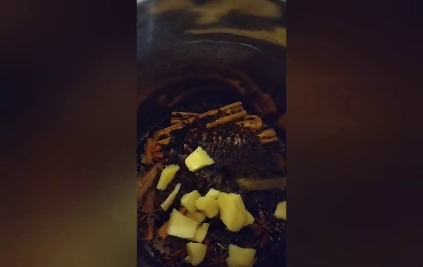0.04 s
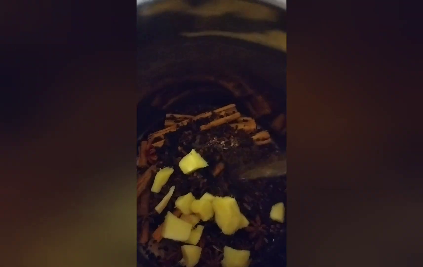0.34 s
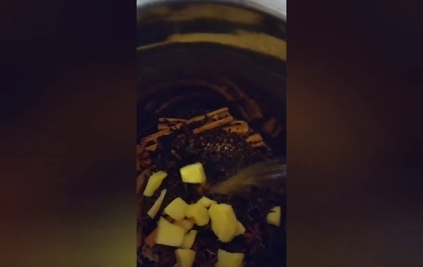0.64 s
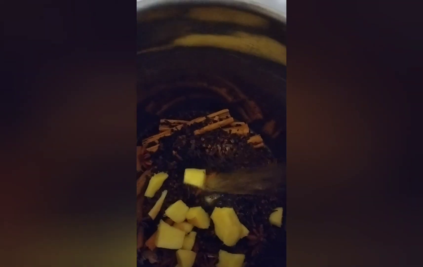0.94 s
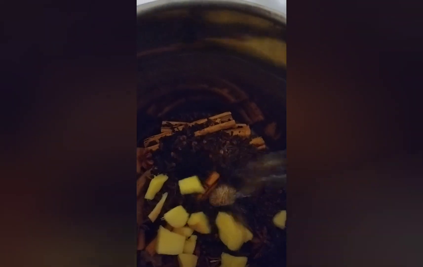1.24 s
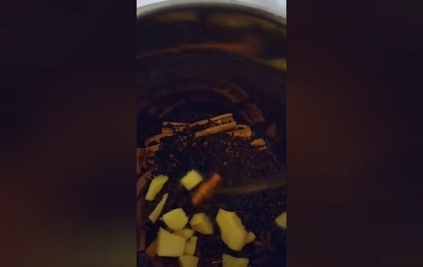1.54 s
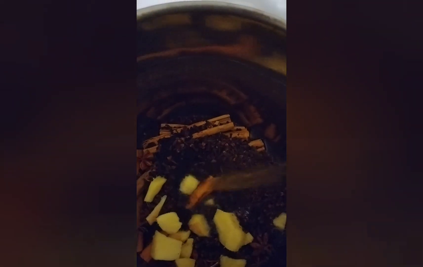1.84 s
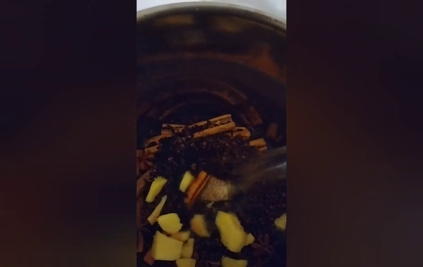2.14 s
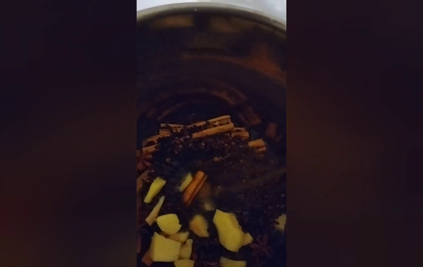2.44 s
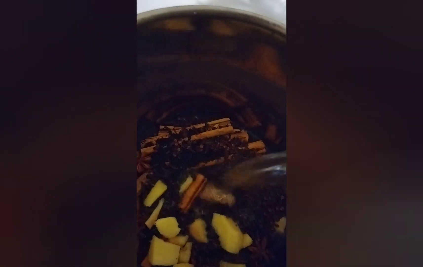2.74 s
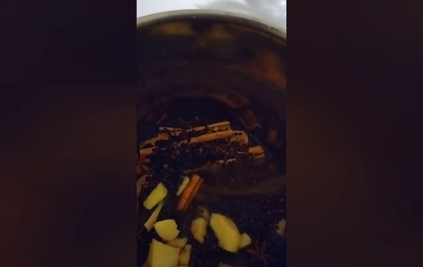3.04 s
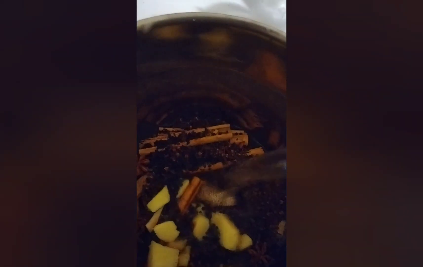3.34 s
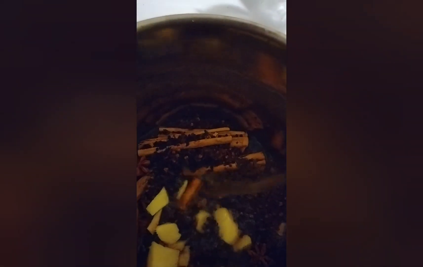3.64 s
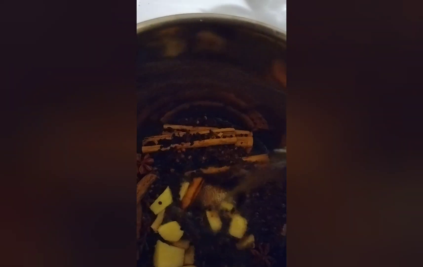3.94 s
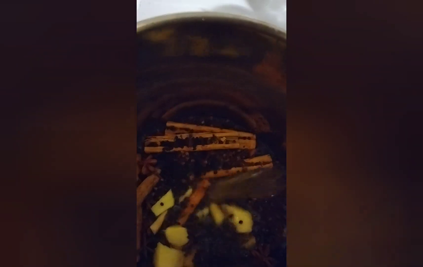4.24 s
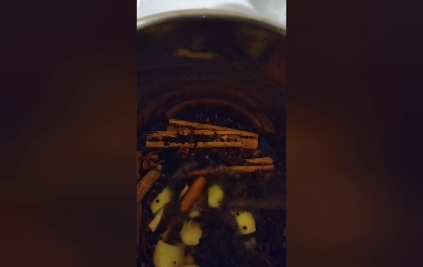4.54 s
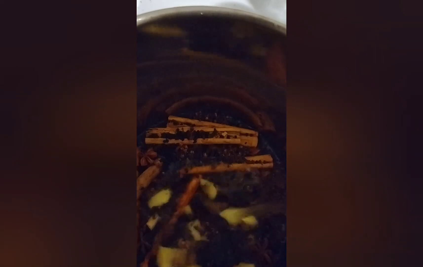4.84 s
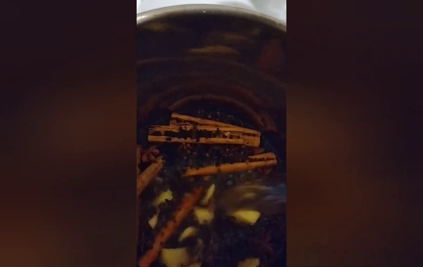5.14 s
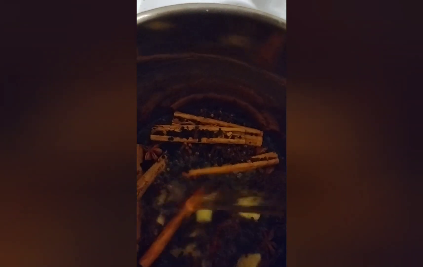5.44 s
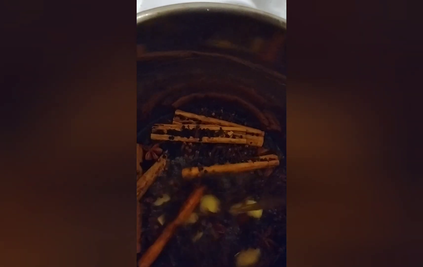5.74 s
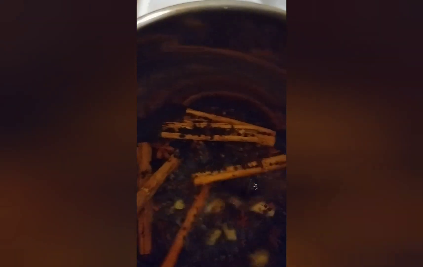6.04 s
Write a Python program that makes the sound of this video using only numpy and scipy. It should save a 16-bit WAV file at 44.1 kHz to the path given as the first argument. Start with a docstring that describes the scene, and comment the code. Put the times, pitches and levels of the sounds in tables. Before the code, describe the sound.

A bottle glugs as its water splashes unevenly into a metal pot of dry spices, gurgling more as a pool forms.

```python
"""Water poured onto spices in a pot

Water runs from a bottle into a metal pot of dry spices, close to a microphone. The bottle gulps air
about four times a second, so the stream arrives in slugs that thud, spatter and bubble over the
spices. Drops tap the steel base until water covers it. The air in the pot rings with all of it."""
import sys
import numpy as np
from scipy import signal
from scipy.fft import rfft, irfft, next_fast_len
from scipy.io import wavfile

SR = 44100
rng = np.random.default_rng(int(sys.argv[2]) if len(sys.argv) > 2 else 0)


def master_out(mix):
    """Clip the mix to full scale and print it as 16-bit PCM to the path in sys.argv[1]."""
    frames = np.transpose(np.atleast_2d(mix))
    ceiling = np.clip(frames, -1, 1)
    pcm = np.round(ceiling * 32767).astype(np.int16)
    wavfile.write(sys.argv[1], SR, pcm)


N = 277731
TIME_S = np.arange(N) / SR
PLOP_CYCLES, DRIP_CYCLES = 2.3, 7.5

# slugs of water leaving the bottle: (start [s], length [s], spray [dB], bubbling [dB])
SLUGS = [(0.01, 0.11, -27, -34.5), (0.12, 0.3, -29, -32), (0.448, 0.19, -30, -27.5),
         (0.634, 0.16, -30.5, -29.5), (0.77, 0.13, -31.5, -31.5), (0.913, 0.16, -26.5, -30.5),
         (1.083, 0.21, -32, -30), (1.282, 0.17, -29.5, -30.5), (1.41, 0.24, -33, -32),
         (1.641, 0.15, -30, -33), (1.811, 0.2, -28.5, -29), (2.009, 0.16, -28, -29),
         (2.162, 0.22, -28.5, -32), (2.379, 0.2, -28, -27.5), (2.569, 0.15, -28.5, -31),
         (2.678, 0.11, -35.5, -29.5), (2.776, 0.19, -29.5, -31), (2.993, 0.19, -29, -30),
         (3.205, 0.18, -28.5, -29.5), (3.397, 0.19, -29, -31), (3.582, 0.21, -28, -27.5),
         (3.793, 0.24, -28.5, -28.5), (4.049, 0.19, -30.5, -31), (4.283, 0.18, -32, -30.5),
         (4.507, 0.19, -29.5, -30.5), (4.745, 0.19, -30.5, -29), (4.964, 0.22, -32.5, -31),
         (5.178, 0.22, -34, -30), (5.453, 0.18, -30, -31), (5.663, 0.11, -29.5, -40.5),
         (5.754, 0.12, -24.5, -25.5), (5.892, 0.22, -29, -30.5), (6.157, 0.14, -31.5, -33)]


def flow(levels_db, trickle_db, trickle_db_per_s, lean_db, splash_db, build_s=0.086, break_s=0.02):
    """Stream envelope: slugs and splashes over a fading trickle; lean_db weakens each slug's head."""
    # stream slapping the spices: (time [s], level [dB])
    splashes = [(0.488, -31), (0.38, -26.5), (0.62, -26.5), (0.87, -26), (1.035, -30.5), (1.385, -25.5),
                (1.53, -29), (2.46, -26.5), (2.745, -27.5), (3.105, -30), (3.484, -32), (4.685, -37),
                (4.84, -42), (4.928, -31), (5.291, -30.5), (5.365, -30.5), (5.417, -25), (5.54, -26),
                (5.948, -26.5), (6.242, -30)]
    splash_s = 0.048
    power = gain_of(trickle_db + trickle_db_per_s * TIME_S) ** 2
    for (start_s, length_s, _, _), db in zip(SLUGS, levels_db):
        t = np.arange(int((length_s + 6 * break_s) * SR)) / SR
        shape = np.minimum(t / build_s, 1) * np.exp(-np.maximum(t - length_s, 0) / break_s)
        level = gain_of(db + lean_db * (np.minimum(t / length_s, 1) - 1))
        add(power[None], start_s, (shape * level) ** 2)
    for s, db in splashes:
        splash = gain_of(db + splash_db) * np.hanning(int(splash_s * SR))
        add(power[None], s - splash_s / 2, splash ** 2)
    return np.sqrt(power)


def spray(strength, mist_db=-1.5, droplets_db=-4, afloat_s=4.1):
    """Fine spatter and tinkling droplets; the treble softens once the spices float."""
    # mist EQ: (frequency [Hz], gain [dB])
    mist_eq = [(1800, 15), (2600, -1.5), (3100, -2), (4000, 2), (4800, 4), (5700, 0), (7200, -1),
               (8200, -3.5), (10500, -4.5), (12300, -9.5), (14200, -3)]
    # added EQ with the spices afloat: (frequency [Hz], gain [dB])
    afloat_eq = [(4300, -0.5), (5400, -8), (6100, -5.5), (7000, -1.5), (9500, -4), (14000, -1.5)]
    mist = patter(2516, 13370, per_s=9000, cycles=2.5, spread_db=-1.5, clump_db=2.5, clumps_per_s=100,
                  patch_db=3.5, pan=0.5, count=36)
    droplets = patter(3500, 11500, per_s=420, cycles=DRIP_CYCLES, spread_db=3.2, clump_db=2.4,
                      clumps_per_s=110, pan=1, count=48)
    mist = colour(np.diff(mist, prepend=0) + mist / 2, mist_eq)
    spatter = mist / rms(mist) * gain_of(mist_db) + droplets * gain_of(droplets_db)
    afloat = np.clip(TIME_S - afloat_s, 0, 1)
    return ((1 - afloat) * spatter + afloat * colour(spatter, afloat_eq)) * strength


def bubbles(bubbling, sloshing, fine_db=-6, chirps_db=-4, fizz_db=-6, slosh_db=-7, gurgle_db=-6):
    """Bubbles where the stream lands; a deeper pool gives more gurgle, fizz and rising chirps."""
    fine = patter(1563, 2340, per_s=900, cycles=4.2, spread_db=4, clump_db=1.5, clumps_per_s=38,
                  count=12)
    chirps = patter(1050, 2600, per_s=420, cycles=3.8, spread_db=3.8, clump_db=2, clumps_per_s=40,
                    glide=0.06)
    fizz = patter(2860, 4370, per_s=660, cycles=DRIP_CYCLES, spread_db=5, clump_db=8.5,
                  clumps_per_s=37, count=12)
    slosh = patter(740, 1500, per_s=1200, cycles=0.97, spread_db=4, clump_db=2, clumps_per_s=66,
                   count=12)
    gurgle = patter(365, 670, per_s=220, cycles=PLOP_CYCLES, spread_db=3.5, clump_db=4, clumps_per_s=28)
    depth = TIME_S / TIME_S[-1]
    shallow = 1 - 0.42 * depth ** 2
    foam = fine * shallow * gain_of(fine_db)
    foam += (chirps * gain_of(chirps_db) + fizz * gain_of(fizz_db)) * depth ** 2
    swirl = slosh * shallow * gain_of(slosh_db) + gurgle * depth ** 3 * gain_of(gurgle_db)
    return foam * bubbling + swirl * sloshing


def gulps(neck_hz=298, rise_s=0.00033, glide_per_s=0.16, gain_db=-5, echo_s=0.034, echo_db=-15):
    """A big bubble enters the bottle and throbs under a brief upper mode; a faint room echo follows."""
    # air drawn through the neck: (time [s], level [dB], decay [s])
    intakes = [(0.636, -20.5, 0.0093), (2.38, -24.5, 0.01), (2.585, -22, 0.0099), (2.791, -16.5, 0.011),
               (2.992, -22, 0.019), (3.182, -15.5, 0.02), (3.383, -16.5, 0.021), (3.607, -18.5, .018),
               (3.841, -18, 0.018), (4.066, -16.5, 0.017), (4.298, -17.5, 0.018), (4.545, -16, .018),
               (4.771, -15, 0.016), (5.007, -16, 0.014), (5.242, -16, 0.01), (5.47, -16.5, .011),
               (5.694, -17.5, 0.0065), (5.928, -20.5, 0.012), (6.154, -22, 0.01)]
    out = np.zeros((2, N))
    t = np.arange(4000) / SR
    for s, db, decay_s in intakes:
        detune, lag, upper_level, upper_detune = rng.standard_normal(4)
        swell = (1 - np.exp(-t / rise_s)) * np.exp(-(t / decay_s) ** 2)
        swell /= swell.max()
        phase = 2 * np.pi * neck_hz * (1 + 0.025 * detune) * (t + glide_per_s * t ** 2)
        upper_ratio = 1.816 + 0.14 * upper_detune
        upper = gain_of(-4 + 2.5 * upper_level) * swell ** 3.5 * np.sin(upper_ratio * phase)
        throb = -gain_of(db + gain_db) * (swell * np.sin(phase) + upper)
        add(out, s, throb)
        add(out, s + echo_s * (1 + lag / 10), throb * gain_of(echo_db))
    return out


def thuds(gain_db=-3, splash_gain_db=-1, bump_hz=150, bump_db=-7, cushion_db_per_s=-5):
    """Lumps of water land with a dull push and coarse splash, bumping a base the pool slowly cushions."""
    # landings: (time [s], level [dB], pitch [Hz], splash [dB], splash swell [s])
    lumps = [(0.218, -20, 420, -23.5, 0.0028), (0.257, -22, 535, -30, 0.003),
             (0.322, -21.5, 266, -26, 0.0035), (0.614, -16.5, 430, -22, 0.0096),
             (0.873, -11.5, 504, -23, 0.0039), (0.957, -14, 940, -20, 0.002),
             (1.223, -15, 680, -28, 0.0052), (1.481, -9, 714, -28, 0.0018),
             (1.594, -14.5, 620, -30, 0.0073), (2.36, -21.5, 400, -26, 0.0055),
             (2.549, -17, 610, -30, 0.0088), (2.738, -13, 430, -23, .009), (2.959, -20.5, 480, -29.5, 0.01),
             (3.064, -21, 634, -34, .003), (3.167, -21, 402, -26.5, 0.014), (3.371, -13.5, 480, -35, .009),
             (3.576, -18.5, 360, -30, 0.0058), (3.686, -16, 920, -26, 0.0017),
             (5.372, -21, 600, -27.5, 0.006), (5.5995, -17, 804, -23.5, 0.0033),
             (5.848, -17, 517, -33.5, 0.016), (6.28, -11.5, 535, -24, 0.0062)]
    out = pops([row[:3] for row in lumps], cycles=0.8, glide=0, gain_db=gain_db)
    t = np.arange(6000) / SR
    bursts = np.zeros((1, N))
    for s, db, _, splash_db, swell_s in lumps:
        add(bursts, s - swell_s / 2, gain_of(splash_db + splash_gain_db) * swell_and_fade(t, swell_s))
        add(out, s, gain_of(db + bump_db + cushion_db_per_s * s) * bubble(bump_hz, cycles=0.5))
    coarse = patter(300, 1700, per_s=2500, cycles=1.5, spread_db=0, clump_db=1, clumps_per_s=170,
                    count=14)
    return out + bursts * coarse


def plops(gain_db=-4, brood_gain_db=-4, scatter=0.18, count=60):
    """A large bubble closes and sheds a brood of others near its own pitch."""
    # large bubbles: (time [s], level [dB], pitch [Hz], brood [dB], brood swell [s])
    closures = [(0.221, -12.5, 1470, -23, 0.0034), (.3006, -0.5, 890, -36, .004),
                (0.3029, -6.5, 1250, -40, .004), (0.3044, -12, 1200, -30, 0.0083),
                (.543, -11, 1950, -29, .003), (1.255, -13.5, 1810, -35, .006),
                (1.631, -10, 1940, -25, .003), (2.867, -6.5, 2130, -30, 0.0025),
                (3.364, -13.5, 1360, -38, 0.0034), (3.871, -12, 1900, -26, 0.0041),
                (5.039, -15, 1500, -28.5, 0.0039), (5.286, -19, 1920, -26, .006),
                (5.355, -12.5, 1650, -24, 0.0058), (5.523, -14, 1820, -23, 0.0076),
                (5.599, -12.5, 1710, -26, 0.0017), (5.781, -21, 1160, -29, 0.0089),
                (5.828, -16, 1680, -24, .007), (5.943, -9, 1840, -21, 0.0032),
                (5.956, -5, 2400, -20, 0.0027), (6.057, -14, 1490, -26, .003),
                (6.227, -17, 1590, -35, .004), (6.25, -15, 1250, -23, .005)]
    out = pops([row[:3] for row in closures], cycles=PLOP_CYCLES, glide=0.012, gain_db=gain_db)
    for s, _, hz, brood_db, swell_s in closures:
        t = np.arange(int(7 * swell_s * SR)) / SR
        brood = np.zeros((1, len(t)))
        for when, pitch in rng.random((count, 2)):
            add(brood, when * t[-1], bubble(hz * np.exp(scatter * (2 * pitch - 1)), PLOP_CYCLES))
        add(out, s, gain_of(brood_db + brood_gain_db) * brood / rms(brood) * swell_and_fade(t, swell_s))
    return out


def ticks(ping_db=-4.5, mist_db=-4, rise_s=0.0002, decay_s=0.0022):
    """A drop snaps with a short ping and a puff of mist, brighter at higher pitch."""
    # sharp drops and bursting bubbles: (time [s], level [dB], pitch [Hz])
    drops = [(.317, -7.5, 5160), (.3816, -2.5, 4570), (.8315, -13, 3500), (1.1246, -1, 9100),
             (1.449, -12, 5700), (1.466, -7, 5100), (1.481, -10, 5700), (1.51, -7, 4270), (1.984, -7, 7000),
             (2.282, -1.5, 10600), (3.255, -2, 9500), (3.315, -16, 3840), (3.3412, -2.5, 7250),
             (3.944, -6, 4700), (4.004, -6.5, 9400), (4.593, -8, 5040), (4.832, -13, 3800),
             (4.846, -12, 3500), (5.173, -5.5, 7000), (5.5995, -3.5, 4640), (6.106, -5, 5360)]
    out = pops(drops, cycles=3.5, glide=0.0059, gain_db=ping_db, pan=0.099)
    t = np.arange(900) / SR
    puff = np.minimum(t / rise_s, 1) * np.exp(-t / decay_s)
    for s, db, hz in drops:
        highpass = signal.butter(2, hz / 2, "highpass", fs=SR)
        mist = signal.lfilter(*highpass, rng.standard_normal((2, len(t))))
        add(out, s, gain_of(db + mist_db) * (mist + mist[::-1] / 2) / 2 * puff)
    return out


def plunges(thump_hz=187, thump_db=-1, gloop_db=-3):
    """Water freed by a gulp thumps into the pool; trapped air gurgles up."""
    # plunging water: (time [s], level [dB])
    falls = [(3.102, -30), (3.303, -26), (3.52, -24.5), (3.741, -21.5), (3.958, -22.5), (4.192, -24.5),
             (4.429, -22.5), (4.661, -21.5), (4.894, -17.5), (5.13, -23), (5.371, -22), (5.592, -24.5),
             (5.844, -22.5), (6.27, -23.5)]
    # big air pockets: (time [s], level [dB], pitch [Hz])
    gloops = [(5.785, -22, 380), (5.805, -33, 344), (5.873, -21.5, 403)]
    thumps = pops([(s, db, thump_hz) for s, db in falls], cycles=0.45, glide=0, gain_db=thump_db)
    return thumps + pops(gloops, cycles=4.2, glide=0.0044, gain_db=gloop_db)


def pool(strength, bare_hz=385, full_hz=270, width_hz=125, burble_db=1.9):
    """The stream churns the pool and drums on the base, whose note sinks under the water's weight."""
    # levels at mean flow: (time [s], drumming [dB], churn [dB])
    levels = [(0, -47, -56), (.6, -41, -58), (1.7, -40.5, -49.5), (2.4, -41.5, -44), (4.3, -45, -51.5),
              (6.3, -49, -42.5)]
    times_s, drum_db, churn_db = np.transpose(levels)
    lowpass = signal.butter(2, width_hz / 2, fs=SR, output="sos")
    hum = signal.sosfilt(lowpass, rng.standard_normal(N) + 1j * rng.standard_normal(N))
    carrier = np.exp(2j * np.pi * np.cumsum(np.geomspace(bare_hz, full_hz, N)) / SR)
    drum = (hum * carrier).real * gain_of(burble_db * flutter(40))
    churn = patter(88, 290, per_s=150, cycles=1, spread_db=0.5, clump_db=0.5, clumps_per_s=21, count=12)
    surge = strength / strength.mean()
    drum *= gain_of(np.interp(TIME_S, times_s, drum_db)) * surge ** 0.47 / rms(drum)
    churn *= gain_of(np.interp(TIME_S, times_s, churn_db)) * surge ** 0.43
    return drum + churn


def steel_base(strength, taps_per_s=700, cover_db_per_s=-4):
    """Drops tap the bare steel; the rising water quiets it."""
    # base modes: (frequency [Hz], width [Hz], level [dB])
    modes = [(1832, 36, -14), (3320, 130, -13), (4780, 380, -8.5), (7100, 300, -6)]
    taps = rng.standard_normal((2, N)) * (rng.random(N) < taps_per_s / SR)
    taps = taps + 0.5 * taps[::-1]
    out = np.zeros((2, N))
    for hz, width_hz, db in modes:
        ring = signal.oaconvolve(taps, ringing([(hz, width_hz, 0)])[None], axes=1)[:, :N]
        out += gain_of(db) * ring / rms(ring)
    return out * strength * gain_of(cover_db_per_s * TIME_S)


def pot_response(walls_db=-8, room_db=-23, room_t60_s=0.86, size=12000):
    """Direct sound, the pot's air modes, quick scatter between its walls and a faint kitchen tail."""
    # air in the pot: (frequency [Hz], width [Hz], gain [dB])
    air_modes = [(120, 39, 7.5), (226, 40, 7), (306, 45, -5.5), (372, 35, -2.5), (810, 90, -1.5),
                 (1240, 200, -5.5), (1832, 36, 6), (2150, 46, 3), (2275, 40, 1.5)]
    # ring of the walls: (frequency [Hz], t60 [s])
    wall_decay = [(150, 0.05), (500, 0.13), (2000, 0.026), (6000, 0.085), (14000, 0.011)]
    t = np.arange(size) / SR
    hz, frame_s, spectrum = signal.stft(rng.standard_normal((2, size)), SR, nperseg=128)
    spectrum *= gain_of(-60 * frame_s / at_hz(wall_decay, hz)[:, None])
    walls = signal.istft(spectrum, SR, nperseg=128)[1][:, :size] * (t > 0.001)
    walls *= gain_of(walls_db) / np.linalg.norm(walls[0])
    room = rng.standard_normal((2, size)) * gain_of(-60 * t / room_t60_s) * (t > 0.008)
    room *= gain_of(room_db) / np.linalg.norm(room[0])
    return (t == 0) + ringing(air_modes, size) + walls + room


def in_pot(x, count=8):
    """The pot's ring, crossfaded through several random responses so no single colouring sticks."""
    shares = np.maximum(1 - abs(np.linspace(0, count - 1, N) - np.arange(count)[:, None]), 0)
    return sum(signal.oaconvolve(x * share, pot_response(), axes=1)[:, :N] for share in shares)


def bubble(hz, cycles, glide=0):
    """An air pocket swells into ringing and dies away; glide raises its pitch."""
    age = np.arange(int(5 * cycles * SR / hz) + 4) * hz / (SR * cycles)
    return -swell_and_fade(age, 0.5) * np.sin(2 * np.pi * cycles * (age + glide * age ** 2 / 2))


def pops(rows, cycles, glide, gain_db, pan=0):
    """Single bubbles from rows of (time [s], level [dB], pitch [Hz])."""
    out = np.zeros((2, N))
    for (s, db, hz), side in zip(rows, rng.uniform(-pan, pan, len(rows))):
        add(out, s, gain_of(db + gain_db) * bubble(hz, cycles, glide) * np.array([[1 + side], [1 - side]]))
    return out


def patter(low_hz, high_hz, per_s, cycles, spread_db, clump_db, clumps_per_s,
           patch_db=0, glide=0.031, pan=0, count=24):
    """Bubble swarm at rms 1, small ones more numerous; clumps sway all pitches, patches each alone."""
    out = np.zeros((2, N + SR))
    clumps_db = clump_db * flutter(clumps_per_s)
    pitches_hz = np.geomspace(low_hz, high_hz, count)
    for hz in pitches_hz:
        number = int(per_s * N / SR * hz / pitches_hz.sum()) + 1
        when, size, side = np.random.default_rng(rng.integers(1 << 30)).random((number, 3)).T
        starts = (when * N).astype(int)
        grain = bubble(hz, cycles, glide)
        patches_db = patch_db * np.interp(when, np.linspace(0, 1, 300), rng.standard_normal(300))
        sizes_db = spread_db * np.minimum(-np.log(1 - size), 4)
        gains = gain_of(sizes_db + clumps_db[starts] + patches_db)
        samples = (starts[:, None] + np.arange(len(grain))).ravel()
        for channel, sign in enumerate((1, -1)):
            panned = gains * (1 + sign * pan * (2 * side - 1))
            out[channel] += np.bincount(samples, np.outer(panned, grain).ravel(), N + SR)
    return out[:, :N] / rms(out[:, :N])


def ringing(modes, size=6000):
    """Impulse response of damped resonances."""
    t = np.arange(size) / SR
    return sum(gain_of(db) * 2 * np.pi * width_hz / SR * np.exp(-np.pi * width_hz * t)
               * np.cos(2 * np.pi * hz * t) for hz, width_hz, db in modes)


def swell_and_fade(t, peak):
    """Rises to 1 at t = peak, then decays."""
    return t / peak * np.exp(1 - t / peak)


def flutter(per_s):
    """Random wander, rms about 1."""
    return 1.2 * np.interp(TIME_S * per_s, np.arange(4000), rng.standard_normal(4000))


def colour(x, eq):
    """Filters by (frequency [Hz], gain [dB]) points."""
    size = next_fast_len(N + 4096)
    gains = gain_of(at_hz(eq, np.fft.rfftfreq(size, 1 / SR)))
    return irfft(rfft(x, size) * gains, size)[..., :N]


def at_hz(points, hz):
    """Table lookup on a log-frequency axis."""
    points_hz, values = np.transpose(points)
    return np.interp(np.log(hz + 1), np.log(points_hz + 1), values)


def add(mix, s, sound):
    """Mixes a sound in at time s."""
    part = mix[:, max(round(s * SR), 0):][:, :sound.shape[-1]]
    part += sound[..., :part.shape[1]]


def gain_of(db):
    return 10 ** (np.asarray(db) / 20)


def rms(x):
    return np.sqrt(np.mean(x ** 2) + 1e-20)


def scene():
    """The stream and its single events, all ringing in the pot."""
    _, _, spray_db, bubbling_db = np.transpose(SLUGS)
    spatter = flow(spray_db, trickle_db=-39, trickle_db_per_s=-0.41, lean_db=0, splash_db=-0.5)
    bubbling = flow(bubbling_db, trickle_db=-41, trickle_db_per_s=-0.44, lean_db=2.5, splash_db=-4.5)
    sloshing = flow(bubbling_db, trickle_db=-41, trickle_db_per_s=-0.44, lean_db=11.5, splash_db=-2)
    stream = spray(spatter) + steel_base(spatter) + bubbles(bubbling, sloshing) + pool(bubbling)
    return in_pot(stream + gulps() + plunges() + thuds() + plops() + ticks())


def record(dry, low_cut_hz=48, high_cut_hz=14330):
    """Microphone pair: mono below the treble, thin in the deep bass, clipped and band-limited."""
    # stereo width: (frequency [Hz], side gain [dB])
    side_eq = [(3800, -63), (4250, -46), (5400, -10), (7000, -1), (14000, 4)]
    mid = dry.mean(0)
    side = colour((dry[0] - dry[1]) / 2, side_eq)
    highpass = signal.butter(3, low_cut_hz, "highpass", fs=SR, output="sos")
    lowpass = signal.firwin(601, high_cut_hz, window=("kaiser", 8), fs=SR)
    pair = signal.sosfilt(highpass, np.array([mid + side, mid - side]))
    return signal.oaconvolve(np.clip(pair, -1, 1), lowpass[None], "same")


dry = scene()
out = record(dry)
master_out(out)
```